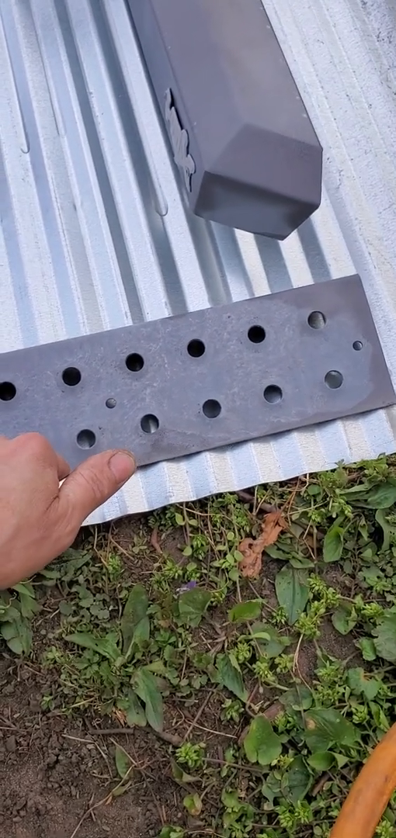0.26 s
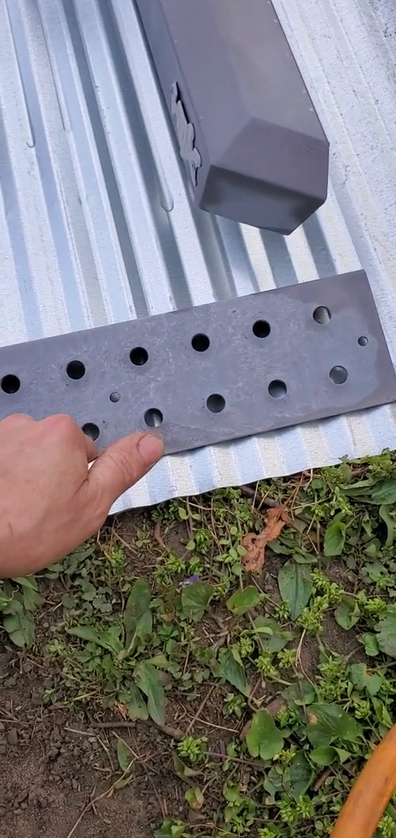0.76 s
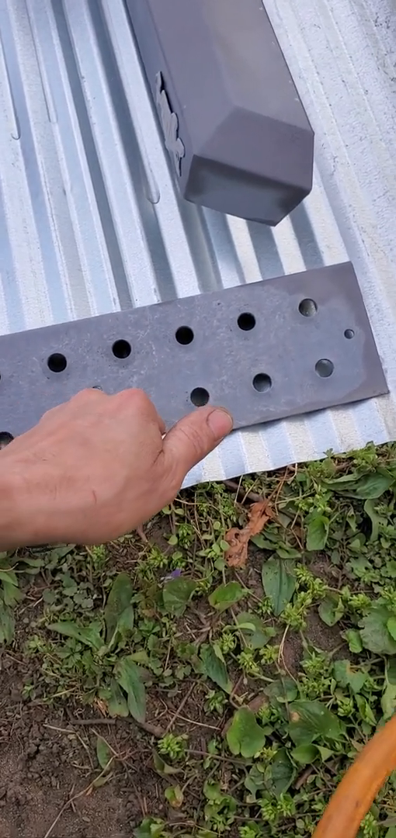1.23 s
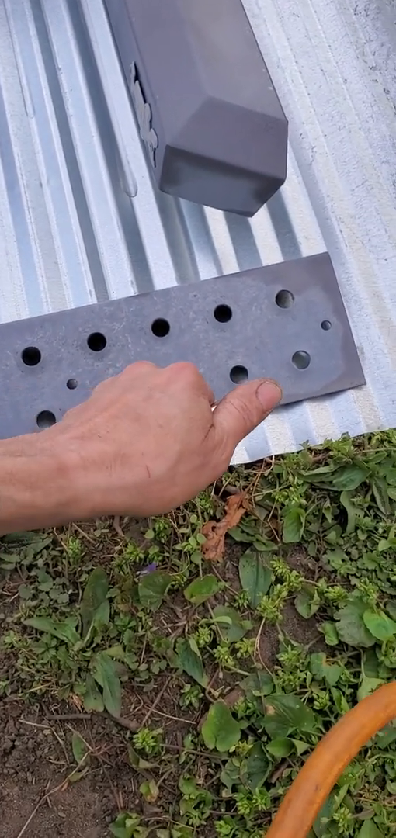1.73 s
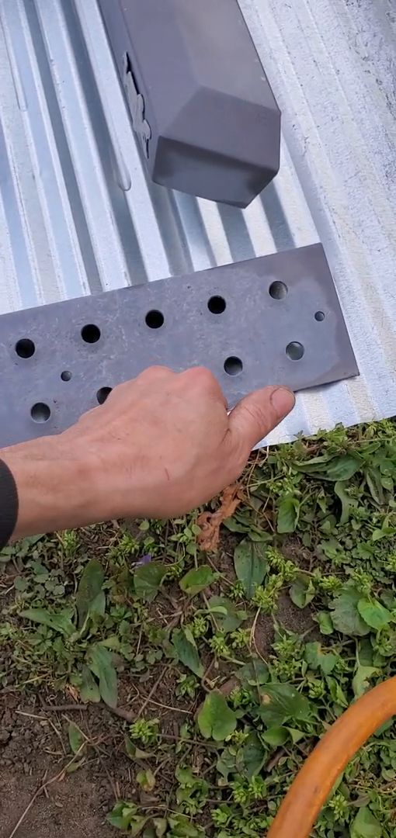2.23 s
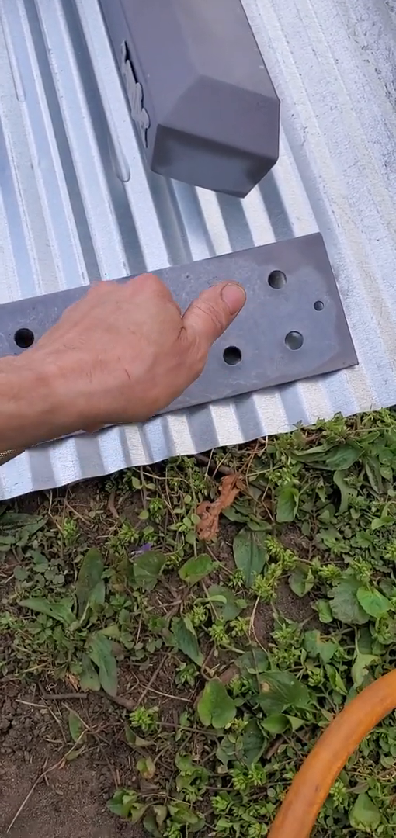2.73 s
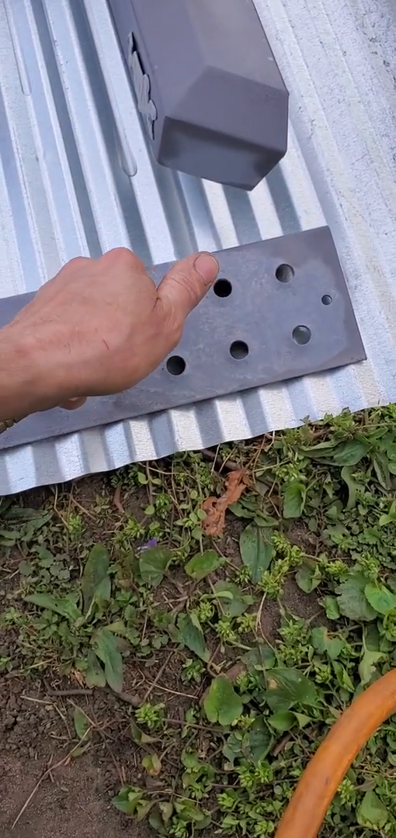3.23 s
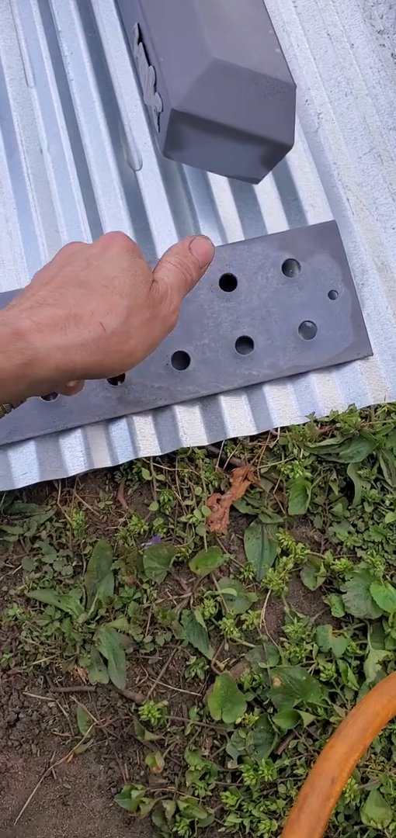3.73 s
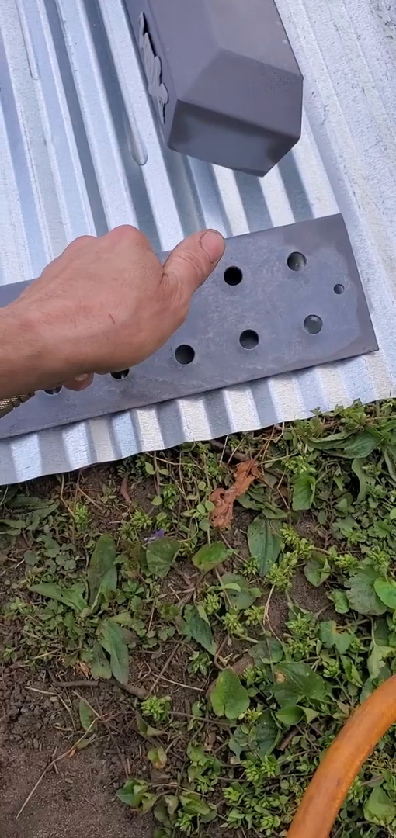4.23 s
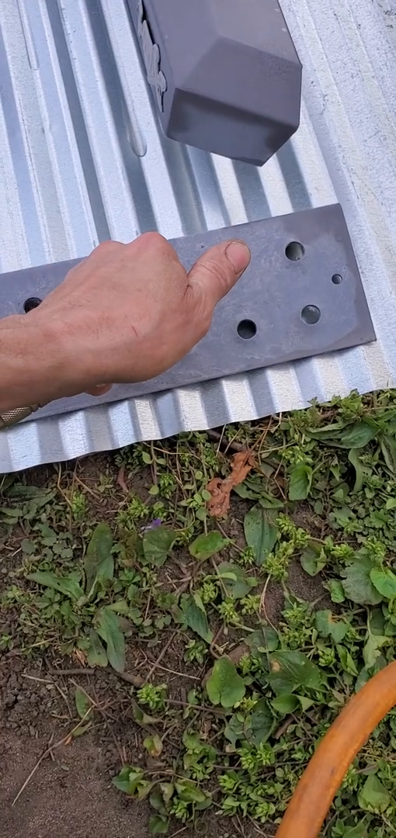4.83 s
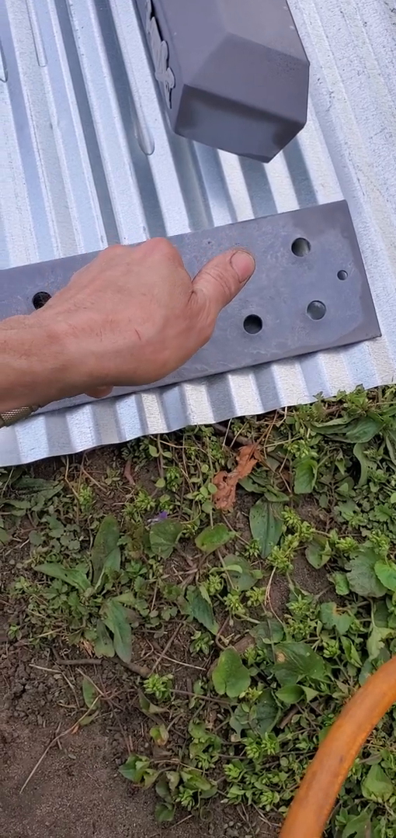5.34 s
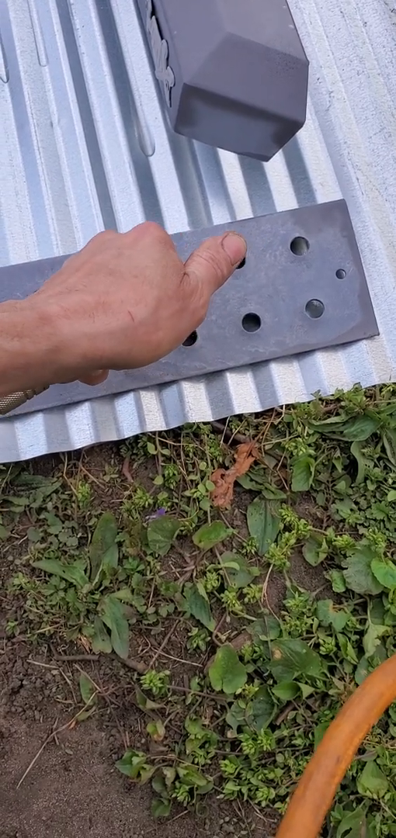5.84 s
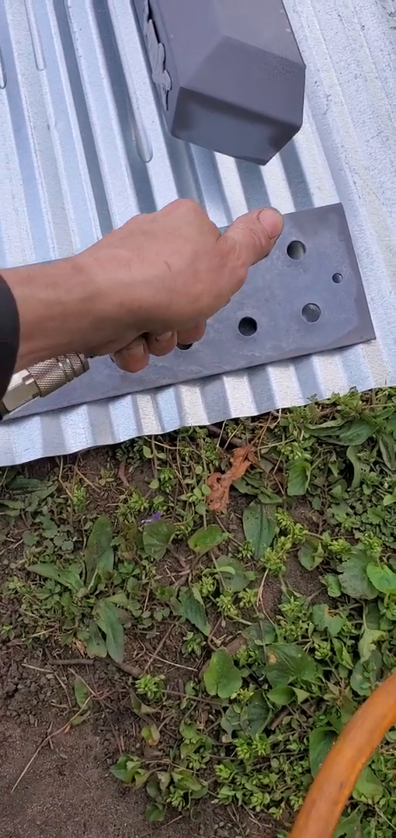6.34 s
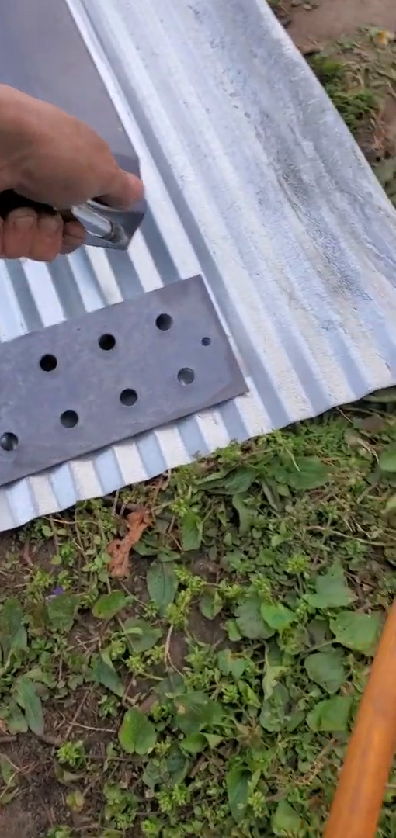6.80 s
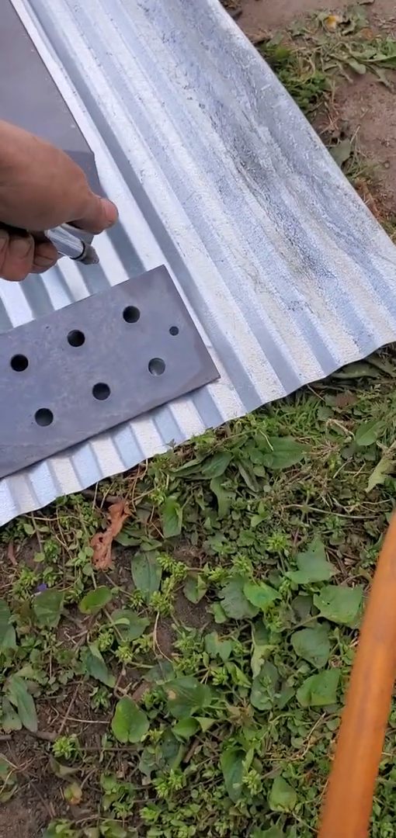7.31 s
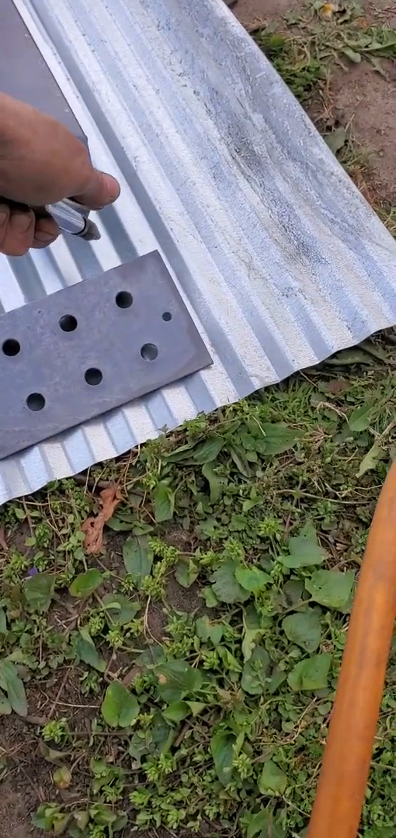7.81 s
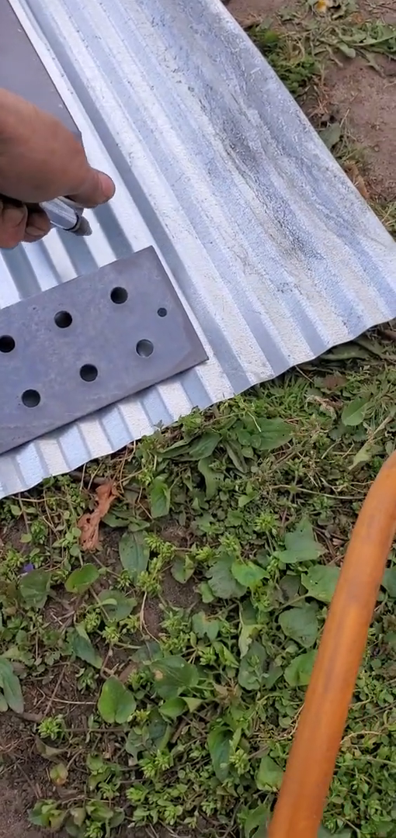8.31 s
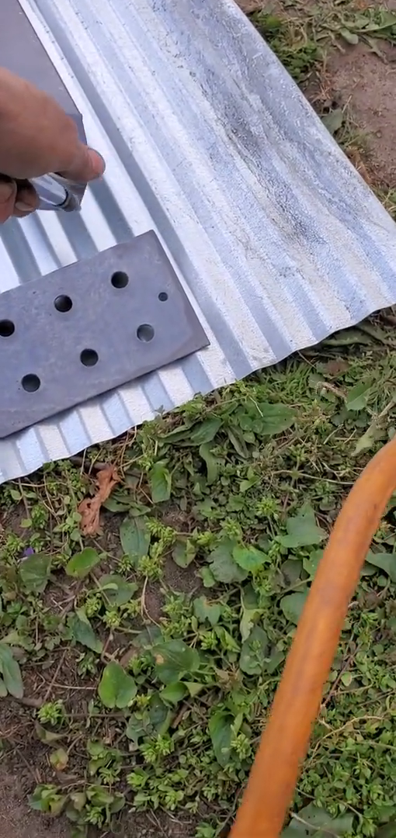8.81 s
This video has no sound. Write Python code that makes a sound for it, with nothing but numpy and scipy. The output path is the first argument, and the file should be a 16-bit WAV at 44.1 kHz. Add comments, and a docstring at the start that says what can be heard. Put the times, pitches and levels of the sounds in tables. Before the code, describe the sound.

Continuous loud rush of pressurized air against holed steel, loud and ringing at first, then thinner and hissier, surging again near the end.

```python
"""Outdoors, a compressed-air blow gun is held close over a drilled steel plate on a corrugated sheet,
and then over a square tube. Noise roars as the jet breaks up on holes and edges, and flares at their rims.
Under it the free jet rushes and hisses all the time, as two more bands of noise with wavering levels.
Each spot colours the sound in its own way, and two microphone ports hear it with different resonances and phases."""
import sys
import numpy as np
from scipy import signal
from scipy.fft import rfft, irfft, next_fast_len
from scipy.io import wavfile
from scipy.ndimage import uniform_filter1d, map_coordinates

SR = 44100
rng = np.random.default_rng(int(sys.argv[2]) if len(sys.argv) > 2 else 0)


def wav_out(sig):
    """Save sig, one row per channel (or a flat mono array), as 16-bit PCM at SR to the path in sys.argv[1]."""
    wavfile.write(sys.argv[1], SR, np.round(np.clip(np.atleast_2d(sig).T, -1, 1) * 32767).astype(np.int16))


N = 399543


def amp(db):
    """Decibels to gain."""
    return 10 ** (np.asarray(db) / 20)


def along(points, hz):
    """Values at hz from (Hz, value) points, joined by straight lines on a log frequency axis."""
    point_hz, value = np.transpose(points)
    return np.interp(np.log(hz + 1), np.log(point_hz + 1), value)


def curves(rows):
    """One value per sample for each column after the time."""
    seconds, *columns = np.transpose(rows)
    t = np.arange(N) / SR
    return [np.interp(t, seconds, column) for column in columns]


def wobble(rate_hz):
    """A smooth random curve through rate_hz normally distributed knots a second."""
    knots = rng.standard_normal(int(N * rate_hz / SR) + 4)
    return map_coordinates(knots, [np.arange(N) * rate_hz / SR])


def filtered(x, response):
    """x shaped by a response of frequency, padded so that its tail does not wrap round."""
    padded = next_fast_len(N + 8192)
    hz = np.fft.rfftfreq(padded, 1 / SR)
    return irfft(rfft(x, padded) * response(hz), padded)[..., :N]


def bell(hz, centre_hz, width_hz):
    """A smooth Gaussian bump of height 1, with width_hz as its standard deviation."""
    return np.exp(-.5 * ((hz - centre_hz) / width_hz) ** 2)


def resonances(rows, hz):
    """Left and right gain of a set of peaks and notches, added up in dB."""
    return amp(sum(np.outer([left_db, right_db], bell(hz, centre_hz, width_hz))
                   for centre_hz, width_hz, left_db, right_db in rows))


# Likeness of the noise at the two ports. Each row: frequency in Hz, coherence from 0 to 1.
PORT_LIKENESS = [(60, .97), (300, .93), (450, .8), (600, .87), (760, .6), (950, .97), (1600, .92),
                 (3200, .8), (5000, .55), (9000, .25), (15000, .1)]


def turbulence(spectrum):
    """Eddies as coloured noise at two ports: mostly alike in the bass, nearly unrelated in the top treble."""
    def shared_and_apart(hz):
        # sum and difference of the two parts then correlate by cos(2 * turn), the likeness
        turn = np.arccos(np.clip(along(PORT_LIKENESS, hz), 0, 1)) / 2
        return amp(along(spectrum, hz)) * [np.cos(turn), np.sin(turn)]
    shared, apart = filtered(rng.standard_normal((2, N)), shared_and_apart)
    return np.array([shared + apart, shared - apart])


# The nozzle moves on to the next spot. Each row: start in seconds, end in seconds.
NOZZLE_MOVES = [(.56, 0.73), (1.08, 1.22), (1.74, 1.76), (2.48, 2.64), (6.5, 6.7)]


def spot_shares(t):
    """How far the nozzle is at each spot at times t, 0-1: one spot fades into the next during a move."""
    reached = [np.interp(t, move, [0, 1]) for move in NOZZLE_MOVES]
    return -np.diff([np.ones(len(t)), *reached, np.zeros(len(t))], axis=0)


# Basic tone of the roar. Each row: frequency in Hz, gain in dB.
ROAR_SPECTRUM = [(100.0, -60), (300.0, -43), (600.0, -18.5), (900.0, -6.5), (1400.0, -0.5), (2100.0, 1.4),
                 (3200.0, 3), (4500.0, -8.5), (6800.0, -15), (7600.0, -27), (10000.0, -31), (16000.0, -32)]
# How squarely the jet is aimed at a hole or an edge. Each row: time in seconds, roar in dB, brightness in dB.
JET_AIM = [(0.02, -8.5, -1.5), (0.45, -7.5, -1.5), (0.6, -12.5, -1.5), (0.95, -8, -3.5), (1.2, -12, -3.5),
           (1.73, -15, 1), (1.82, -31, 2.5), (2.36, -30, 4.5), (2.58, -24.5, 1.5), (2.7, -15, -5),
           (3.1, -22, 3.5), (3.8, -24, 4), (4.2, -20.5, 5.5), (4.6, -13, 0.5), (5.48, -15, -5.5),
           (5.57, -28.5, 1), (6.42, -25, 2.5), (6.68, -16, -4.5), (6.87, -16.5, -12), (7.02, -11.5, 1),
           (8.0, -17, 4.5), (8.25, -16, 0), (8.57, -17.5, -3), (9.03, -15, 0)]
# How strongly the air over the metal rings. One level in dB for each spot, in the order visited.
SPOT_RING_DB = [-3.5, 7, 3.5, 4.5, 1, -1]


def impact_roar(sway_db, flutter_db, sputter_db):
    """The jet breaks up on the metal; it flaps across the rim, so the roar flutters."""
    spot_ring_db = np.array(SPOT_RING_DB) @ spot_shares(np.arange(N) / SR)
    aimed_db = np.array([*curves(JET_AIM), spot_ring_db])
    roar_db, bright_db, ring_db = aimed_db + flares()
    # slow, quick and very fast flapping
    flapping_db = sway_db * wobble(22) + flutter_db * wobble(90) + sputter_db * wobble(600)
    eddies = sharpened(turbulence(ROAR_SPECTRUM), bright_db, ring_db, ring_hz=2020, ring_width_hz=90)
    return amp(roar_db + flapping_db) * eddies


# The jet clips a rim and flares. Each row: time of the peak in seconds, whole length in seconds,
# added roar in dB, added brightness in dB, added ring in dB.
RIM_FLARES = [(0.277, 0.22, .5, 2.5, 1), (0.74, 0.21, 5.5, 2.5, -16), (1.382, 0.21, 2, 5, -1),
              (1.497, 0.13, 2, 6.5, -4), (1.686, .13, 4, -1, -2), (2.15, 0.26, 10, -7.5, -7),
              (2.474, 0.15, 6.5, 3.5, 2), (2.841, 0.24, 6.5, -4, -2), (3.288, 0.19, 3, 2.5, 4.5),
              (3.576, 0.44, 6.5, -0.5, 1), (3.98, 0.2, 4.5, -3, -1), (4.623, 0.18, 2.5, -2.5, 0),
              (5.235, 0.23, 2.5, 2, 2), (5.392, 0.45, 3.5, 4.5, 5), (5.835, 0.36, 8, -3.5, 1),
              (6.469, 0.14, 5, 1.5, -0.5), (7.347, 0.31, 1, 2, 2.5), (7.77, 0.25, 1, 2.5, 1),
              (8.08, 0.29, 0.5, 4.5, 3.5), (8.395, 0.33, 1, 4.5, -2), (8.724, 0.3, 3.5, 5, -6),
              (9.01, 0.16, 0, 4, -3)]


def flares():
    """Clipping a rim changes roar, brightness and ring by some dB, swelling and falling back smoothly."""
    peak_s, length_s, *added_db = np.transpose(RIM_FLARES)
    phase = (np.arange(N) / SR - peak_s[:, None]) / length_s[:, None]
    swell = np.cos(np.pi * np.clip(phase, -.5, .5)) ** 2
    return np.array(added_db) @ swell


def sharpened(x, bright_db, ring_db, ring_hz, ring_width_hz, size=256):
    """A sharp rim sheds finer eddies, which tilt the roar up; the air over the metal rings in one band."""
    hz, t, z = signal.stft(x, SR, nperseg=size)
    at = np.minimum(np.round(t * SR).astype(int), N - 1)
    # brightness comes in from 1500 Hz and is complete from 5000 Hz up
    tilt_db = np.outer(along([(1500, 0), (5000, 1)], hz), bright_db[at])
    band_db = np.outer(bell(hz, ring_hz, ring_width_hz), ring_db[at])
    return signal.istft(z * amp(tilt_db + band_db), SR, nperseg=size)[1][:, :N]


# Levels of the free jet, ahead of its spectra. Each row: time in seconds, rush in dB, hiss in dB.
JET_LEVELS = [(0.02, -28, -40.5), (0.75, -28, -38.5), (1.15, -26, -39), (1.75, -31, -41), (2.2, -30, -36),
              (2.78, -29.5, -37), (2.97, -20.5, -30.5), (3.95, -23, -30), (4.4, -20.5, -28),
              (4.72, -21, -31.5), (5.22, -21.5, -31), (5.44, -32, -40), (5.85, -27.5, -38.5),
              (6.55, -30, -37.5), (6.9, -24, -29), (7.3, -27.5, -30.5), (9.03, -26.5, -32.5)]
# Tone of the large eddies. Each row: frequency in Hz, gain in dB.
RUSH_SPECTRUM = [(20.0, -28), (40.0, -19), (80.0, -11), (160.0, -13.5), (330.0, -1), (700.0, 5),
                 (1500.0, -2), (4000.0, -19), (12000.0, -36)]
# Tone of the small eddies. Each row: frequency in Hz, gain in dB.
HISS_SPECTRUM = [(200.0, -42), (1500.0, -4), (4000.0, -0.5), (6800.0, 2), (7600.0, -7.5), (9000.0, -2.5),
                 (12000.0, 2.5), (15500.0, -1.8)]


def free_jet(rush_waver_db, hiss_waver_db):
    """Large eddies downstream rush; the small ones at the nozzle hiss."""
    rush_db, hiss_db = curves(JET_LEVELS)
    rush = amp(rush_db + rush_waver_db * wobble(12)) * turbulence(RUSH_SPECTRUM)
    hiss = amp(hiss_db + hiss_waver_db * wobble(44)) * turbulence(HISS_SPECTRUM)
    return rush + hiss


# Peaks and notches in the sound heard at each of the six spots.
# Each row: centre in Hz, width in Hz, left gain in dB, right gain in dB.
FIRST_HOLE_COLOUR = [(925, 84, 0.2, 4.5), (2570, 450, -7, -10), (3320, 180, 6, -1.5), (3730, 320, -9.9, -2),
                     (3760, 140, -1, -6), (5140, 330, -2, -13), (5910.0, 187.0, -1.5, 5.5),
                     (6450, 265.0, -1.5, -20), (11500, 470, -1, 6)]
SECOND_HOLE_COLOUR = [(2490, 370, -8, -10), (3060, 76, 0.5, -3), (3850, 260, -7.5, -9), (4670, 140, 2.5, 8),
                      (5110.0, 330, -3, -11), (6639.0, 280, -5, -11), (7163.0, 279.0, 3, 2),
                      (8382.0, 341.0, 0, 2), (11600, 370, -3, 6)]
THIRD_HOLE_COLOUR = [(2310, 43, 0, -14), (2650, 170, -6, -9), (3060, 100, 2, -1), (3940, 107.0, 9, -2),
                     (4200, 160, -8, -1), (4500, 130, 6, 8), (5162.0, 360, 0, -4), (6600, 210, -2, -10),
                     (11600, 370, 0, 5.5)]
PLATE_EDGE_COLOUR = [(2590, 215, -4.5, -10), (3100, 150, 0.5, -4), (3600, 210, -3, 4.5), (3880, 96, 10, -9),
                     (4480, 160, 1.6, 7.5), (6250, 1700, 6, 4.5), (6350, 274.0, 1, -5),
                     (8068.0, 288.0, 0, -13), (12400, 520, -3, -2.2)]
UPPER_HOLE_COLOUR = [(2130, 92, -5, 1), (2296, 75, 5, -2.5), (3105, 112, -2.5, -14), (3550, 150, -2.5, 1),
                     (4100, 140, 0.5, -2), (4370, 240, -2, 0.5), (5070, 190, -6.5, -7.5),
                     (6430, 210, -2, -7), (6870, 190, 2, -6.5), (8400, 540, 3, -3), (10600, 260, 0, -2)]
TUBE_COLOUR = [(1490, 120, -3, -1), (1910, 100, 4.5, -7), (2560, 540, -2, -0.3), (3370, 180, -2, -4.5),
               (4350, 195, 0.5, 6), (4800, 270, 1, -0.5), (5840, 200, -2.5, -4), (7100, 240, -2.1, -7.5),
               (9500, 1300, -3, 1.2)]
# Phase by which the left port leads, for three places of the nozzle.
# Each row: frequency in Hz, lead in radians.
LOWER_PHASE = [(388.0, 0.5), (732.0, 3), (775.0, -0.7), (1507.0, 1.85), (1809.0, 5.5), (2283.0, 10),
               (2972.0, 8), (3316.0, 9), (3747.0, 11.5), (4048.0, 9.5), (4522.0, 11), (5039.0, 12.5),
               (7364.0, 14.5), (16000.0, 26)]
UPPER_PHASE = [(388, 0.6), (732, 3), (818, 0.5), (1150, 0.96), (1637, 3), (2153, 9), (2885, 11), (3402, 10),
               (4400, 18.5), (5600, 20), (6630, 27), (16000, 41)]
TUBE_PHASE = [(345.0, 0.5), (646.0, 2), (775.0, 1.4), (818.0, 0.0), (1938.0, 2.5), (2024.0, 0.2),
              (2369.0, 3.5), (3144.0, 4), (3531.0, 3.5), (4737.0, 7), (4780.0, 6.5), (6331.0, 8.0),
              (7364.0, 8.5), (16000.0, 27.5)]


def spot_colour(x, size=1024):
    """Colour and phase glide from spot to spot with the nozzle, under a slight random ripple in level."""
    spots = [(FIRST_HOLE_COLOUR, LOWER_PHASE), (SECOND_HOLE_COLOUR, LOWER_PHASE),
             (THIRD_HOLE_COLOUR, LOWER_PHASE), (PLATE_EDGE_COLOUR, LOWER_PHASE),
             (UPPER_HOLE_COLOUR, UPPER_PHASE), (TUBE_COLOUR, TUBE_PHASE)]
    hz, t, z = signal.stft(x, SR, nperseg=size)
    log_colour, lead = 0, 0
    for share, (peaks, phases) in zip(spot_shares(t), spots):
        log_colour = log_colour + np.log(resonances(peaks, hz))[..., None] * share
        lead_radians = np.interp(hz, *np.transpose([(0, 0), *phases]))
        lead = lead + np.outer(np.exp(1j * lead_radians), share)

    # the ripple is separate at each port, smoothed over 4 bins of frequency and 30 frames of time
    ripple = uniform_filter1d(rng.standard_normal(z.shape), size=4, axis=1)
    ripple = uniform_filter1d(ripple, size=30, axis=2)
    # it is deeper in the treble
    depth_db = along([(500, 0.5359), (2500, 0.9786)], hz)[:, None]
    ripple_gain = amp(depth_db * ripple / ripple.std())

    # only the left port is turned in phase
    shift = np.array([np.exp(1j * np.angle(lead)), np.ones(lead.shape)])
    return signal.istft(z * ripple_gain * np.exp(log_colour) * shift, SR, nperseg=size)[1][:, :N]


def scene():
    """The free jet and its roar on the metal, coloured by the spot where the nozzle is."""
    jet = free_jet(rush_waver_db=1.5, hiss_waver_db=0.4)
    roar = impact_roar(sway_db=0.71, flutter_db=0.38, sputter_db=0.3)
    return spot_colour(jet + roar)


# Resonances of the microphone ports.
# Each row: centre in Hz, width in Hz, left gain in dB, right gain in dB.
PORT_RESONANCES = [(505, 153, -9.5, -5.5), (800, 107, 1.56, -17), (1605, 167, 7, 3.5),
                   (2191, 208, -1.5, 11.5), (5940, 190, -0.5, 3), (7500, 120, -5, 1.5),
                   (8280, 3380, 6.5, 3), (15650, 2000, 10.5, 0)]
# Sensitivity of the ports. Each row: gain in dB, left and then right.
PORT_SENSITIVITY_DB = [
    [1.0],
    [1.5],
]
BAND_LIMIT_HZ = 15950


def record(dry):
    """The ports colour the sound, and nothing is kept from the band limit up."""
    def port_response(hz):
        return amp(PORT_SENSITIVITY_DB) * resonances(PORT_RESONANCES, hz) * (hz < BAND_LIMIT_HZ)
    return filtered(dry, port_response)


dry = scene()
out = record(dry)
wav_out(out)
```